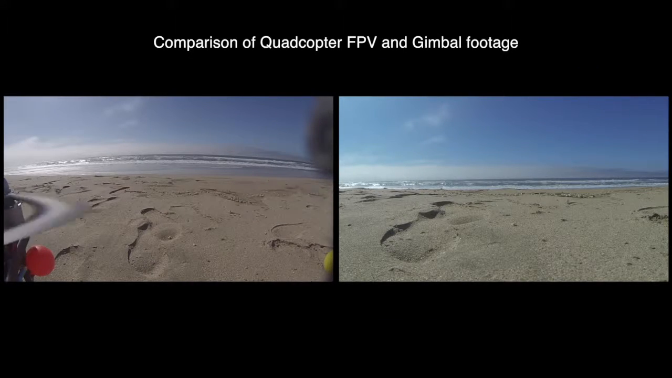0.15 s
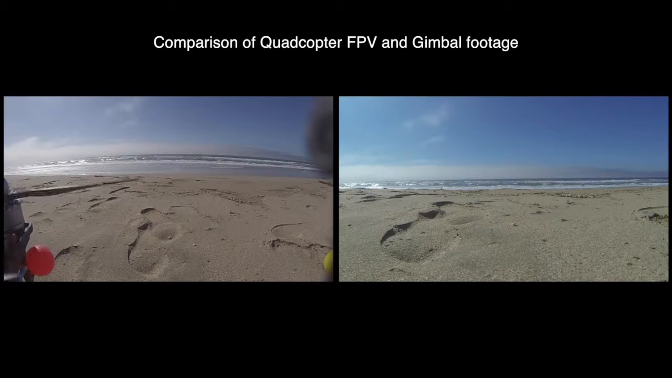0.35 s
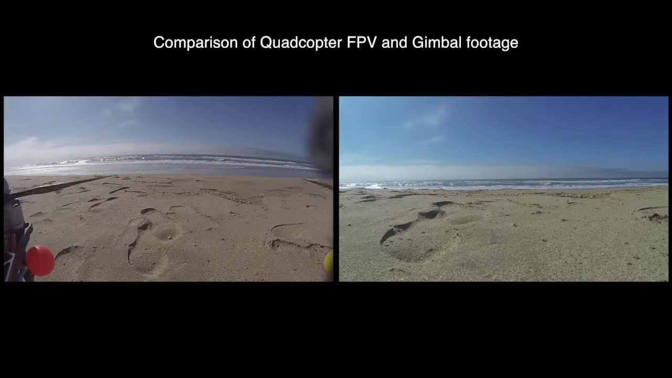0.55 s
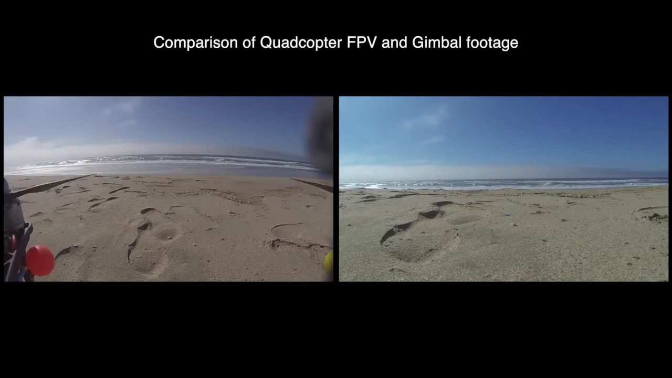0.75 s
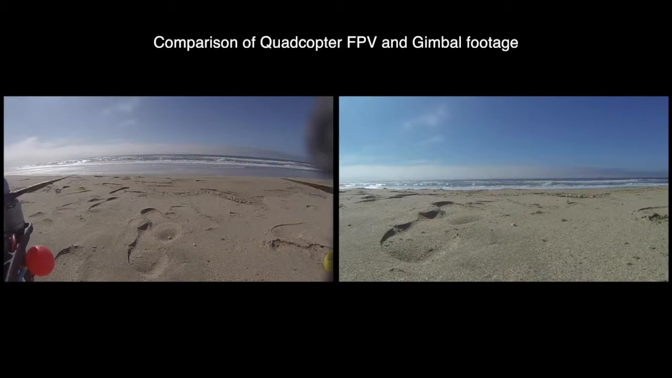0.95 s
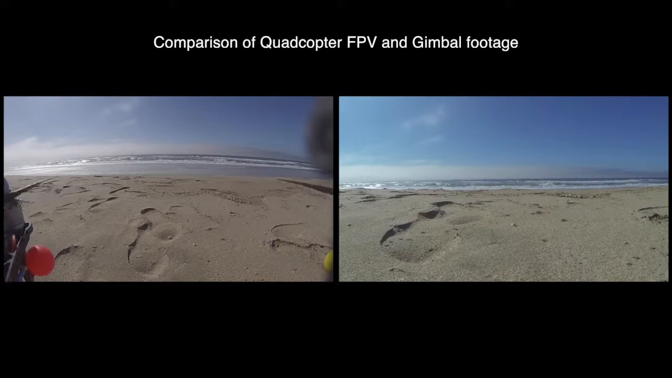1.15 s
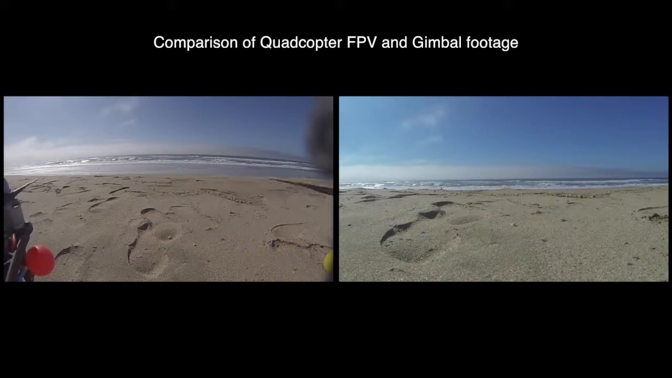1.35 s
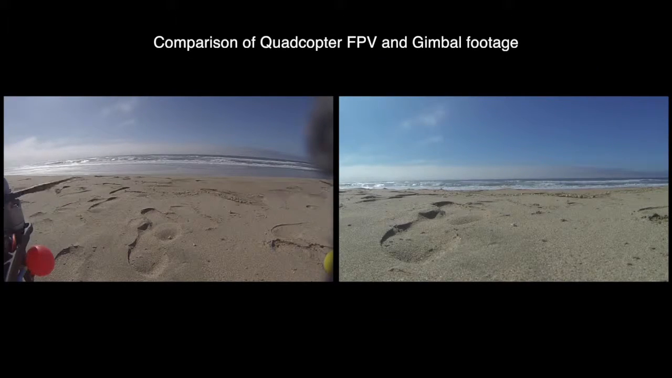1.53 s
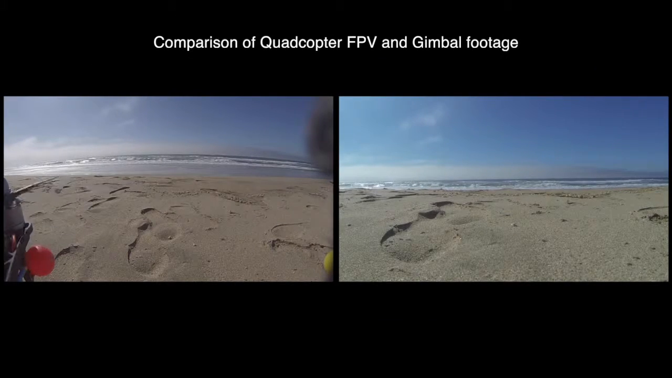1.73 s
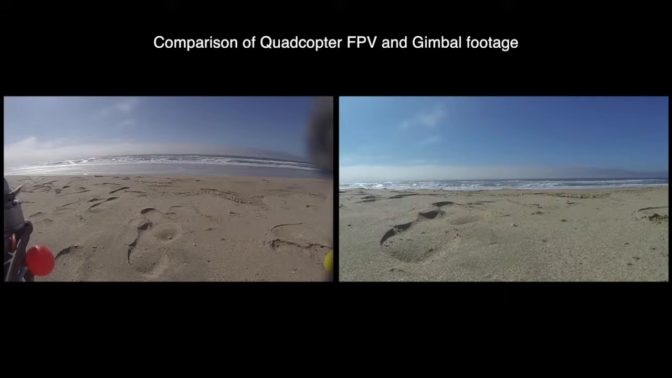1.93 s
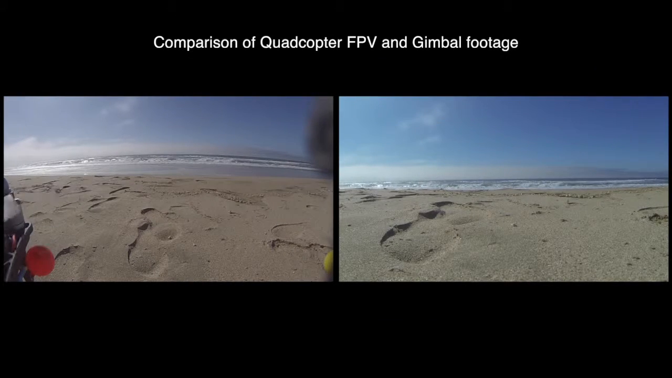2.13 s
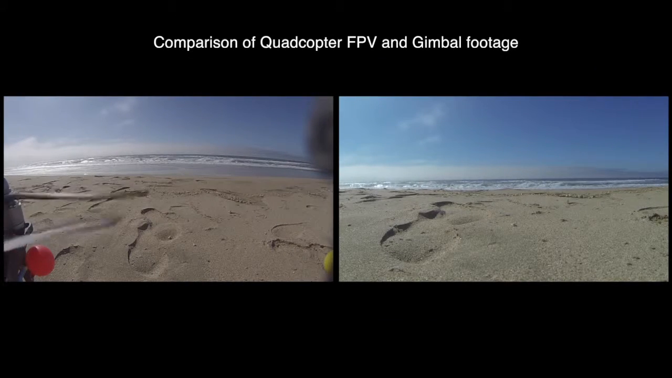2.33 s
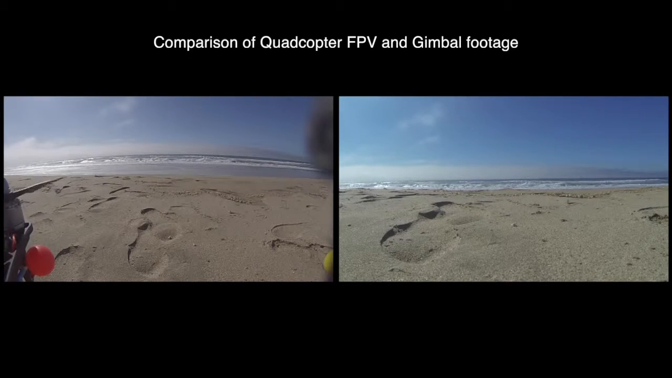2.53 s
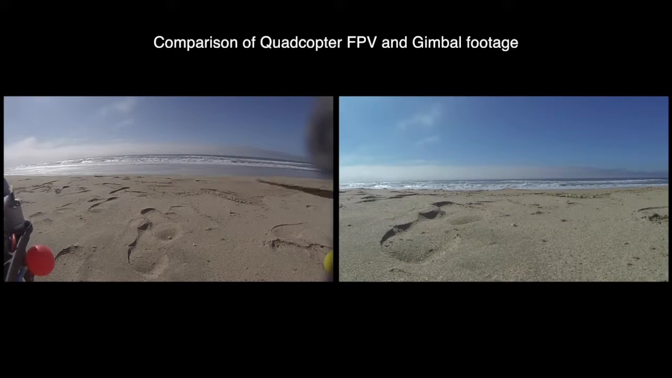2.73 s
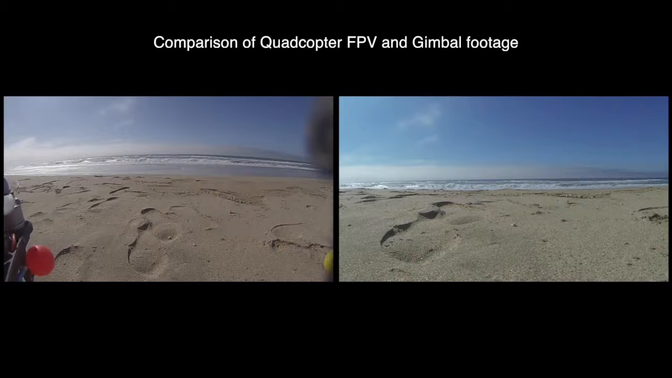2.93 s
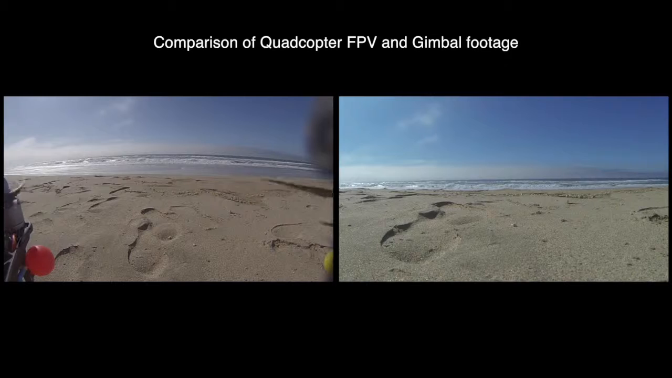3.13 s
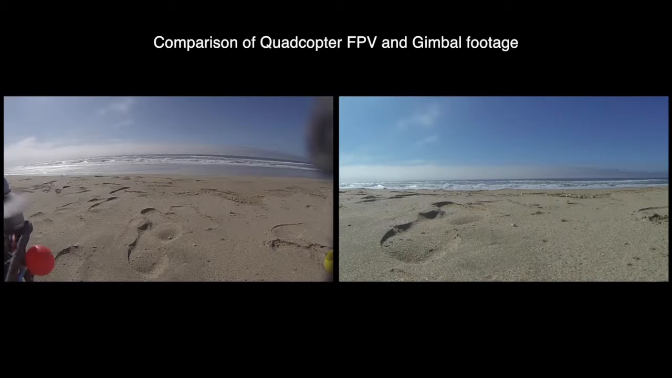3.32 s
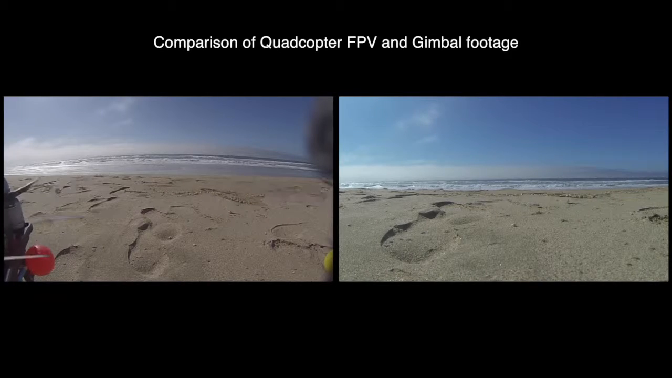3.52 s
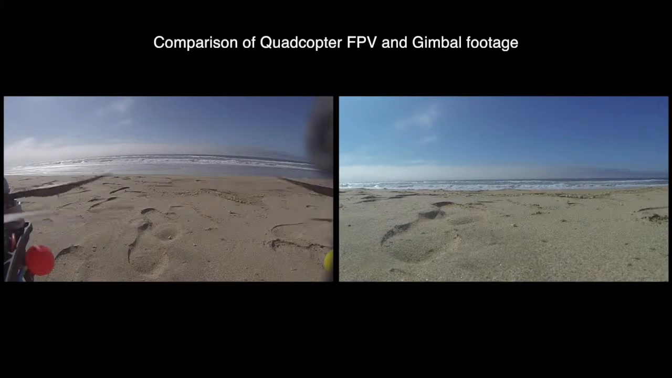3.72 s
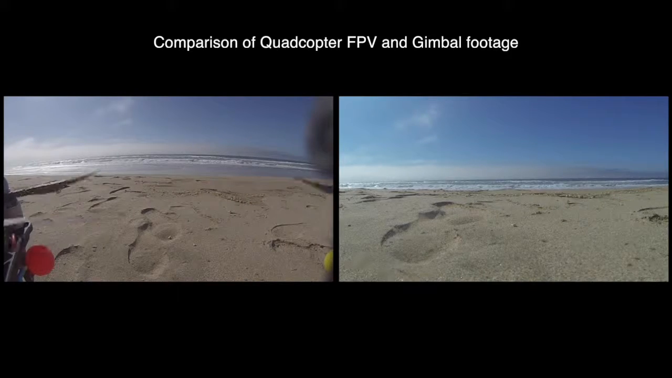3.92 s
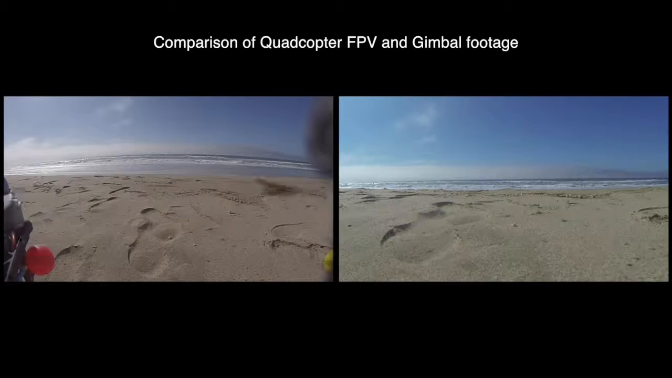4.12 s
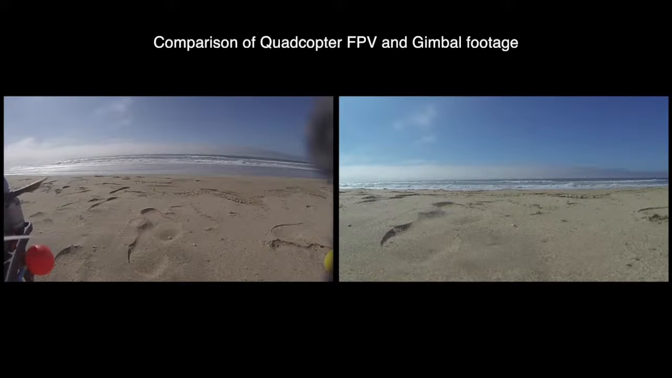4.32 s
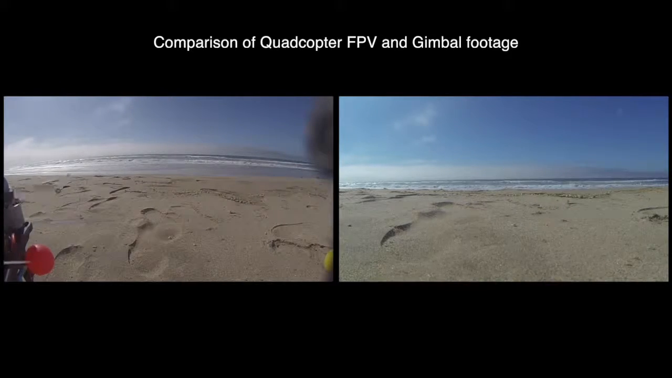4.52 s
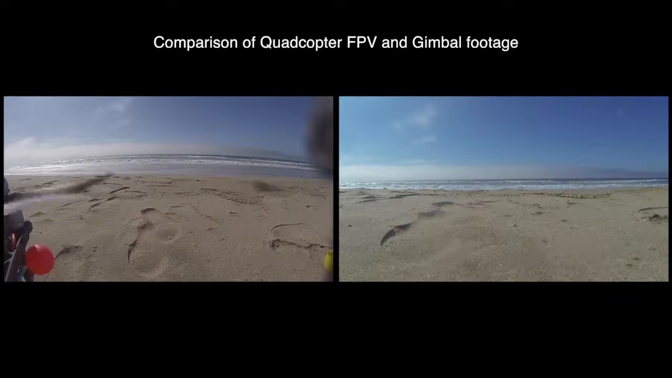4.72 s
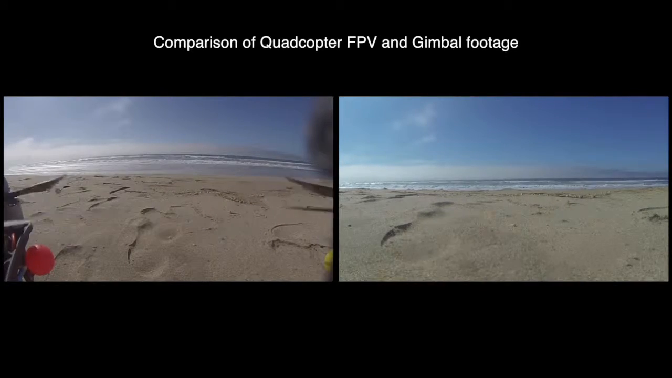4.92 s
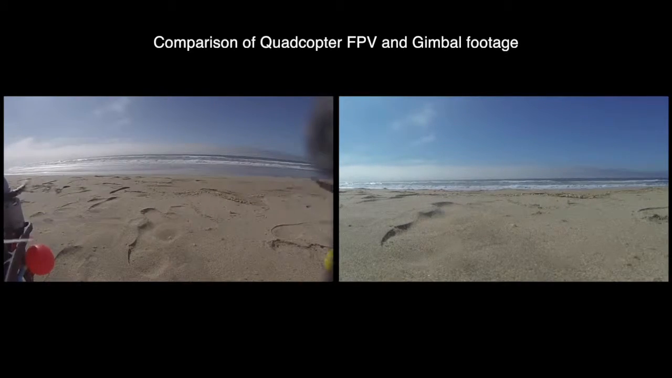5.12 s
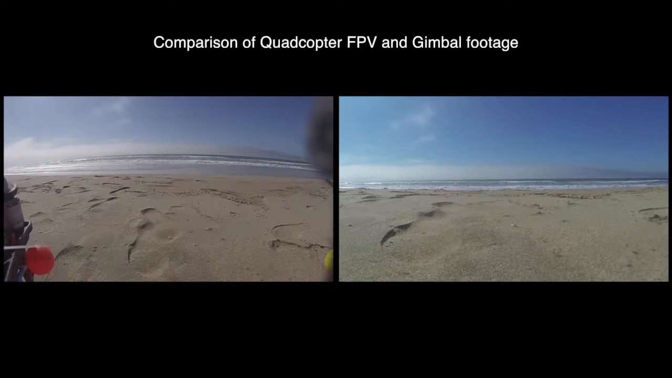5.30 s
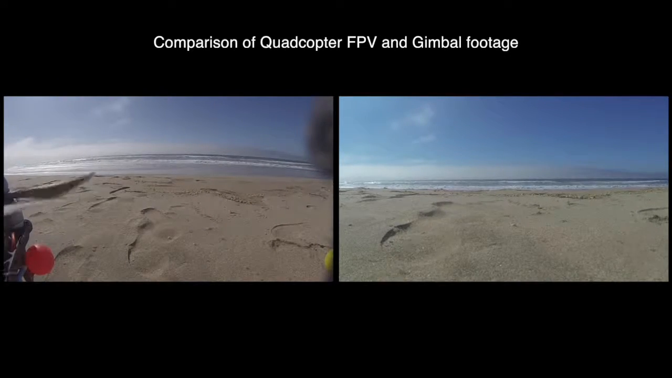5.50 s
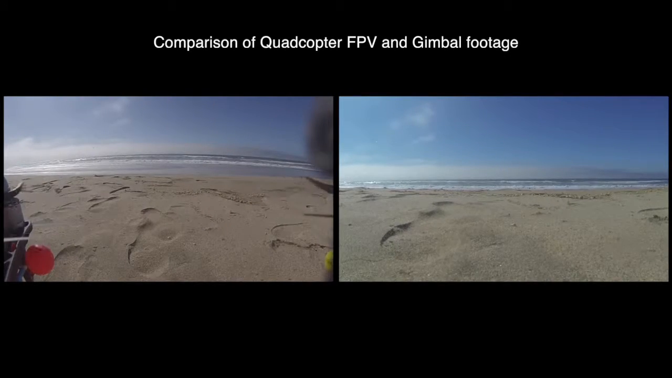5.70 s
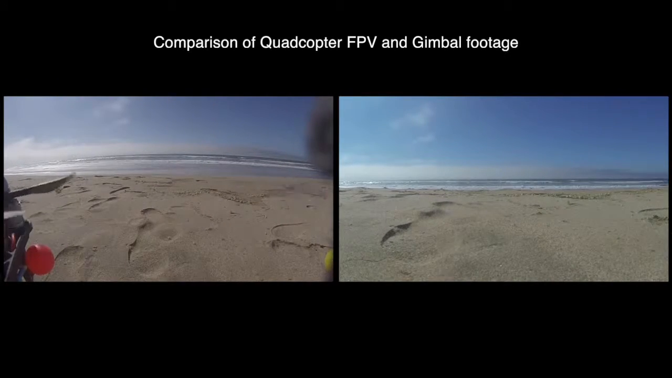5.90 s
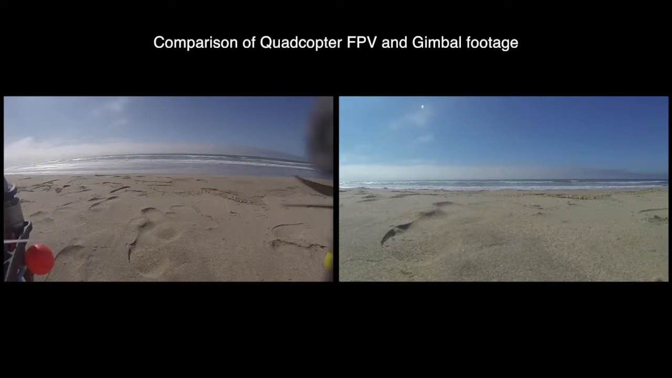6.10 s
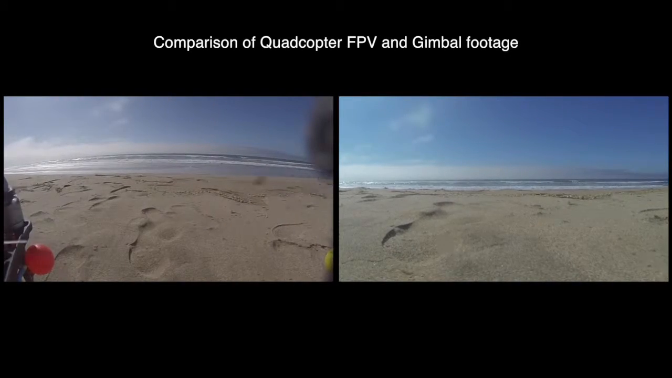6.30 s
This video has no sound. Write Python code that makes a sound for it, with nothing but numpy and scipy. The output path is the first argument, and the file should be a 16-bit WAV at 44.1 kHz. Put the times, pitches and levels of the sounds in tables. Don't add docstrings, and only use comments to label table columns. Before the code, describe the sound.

Close to an idling drone, steady high-pitched motor squeal and rattle over soft surf give way to rising blade buzz and turbulent wind thumps.

```python
import sys
import numpy as np
from scipy import signal
from scipy.fft import rfft, irfft, next_fast_len
from scipy.io import wavfile
from scipy.ndimage import uniform_filter1d

SR = 44100
rng = np.random.default_rng(int(sys.argv[2]) if len(sys.argv) > 2 else 0)


def ratio(d):
    e = np.asarray(d, float) / 20
    return 10 ** e


def wav_out(sig):
    wavfile.write(sys.argv[1], SR, np.round(np.clip(np.atleast_2d(sig).T, -1, 1) * 32767).astype(np.int16))


N = 280035

# (time [s], blade rate [Hz], thump level [dB])
ROTORS = [(2.4, 38.07, -34), (2.5, 46.15, -34), (2.66, 61.47, -20), (2.84, 73.8, -12), (3.0, 82.3, -17.5),
          (3.21, 94.14, -11.5), (3.38, 103.9, -10), (3.5, 110.3, -12), (3.7, 120.4, -12.5),
          (3.81, 124.6, -14), (4.0, 131.7, -17), (4.16, 137.2, -14), (4.4, 144.5, -11),
          (4.91, 157.7, -11.5), (5.59, 175.1, -10), (5.86, 180.5, -10.5), (6.02, 184.9, -12),
          (6.35, 199, -6)]
# (time [s], lag [blade passes])
ROTOR_LAG = [(2.5, .15), (2.68, .24), (2.88, .42), (3.08, .27), (3.21, .5), (3.3, .58), (3.39, .76),
             (3.47, .84), (3.66, 1), (3.78, 1.15), (4.18, 1.15), (4.5, 1.08), (4.91, 1), (5.25, .835),
             (5.58, .82), (5.8, .75), (5.96, .73), (6.3, .47)]
# (chop at rest [Hz], drift by the end [Hz], idle blade rate [Hz],
# speed factor in flight [1], time to reach it [s])
CONTROLLERS = [
    (8021.9, .6, 35.2, 1.0, 1.1),
    (8033.8, 1.2, 39.15, 1.05, 1),
    (8050.2, .8, 39.3, .885, 1),
    (8076.6, 1.8, 39.4, 1.001, .2),
]
# (idle [dB], flight [dB], magnet orders [dB])
FRINGE_REACH = [
    (9.5, 4, 0.5),
    (8, -14, -12),
    (-22, 4, -15),
    (-17, -7, -6),
]
# (first [dB], sag at mid-idle [dB], end of idle [dB], spin-up [dB], flight
# [dB])
CHOP_SHARES = [
    (1, -4.5, -5, -1.1, -.8),
    (-5, 0, 2.3, 2.6, -1.6),
    (-2.8, .3, -4.8, -4.1, -6.5),
    (3.5, -1, -.2, 0, 0),
]
# (start [s], end [s])
LOAD_TRADE_S = (2.8, 3.15)
# (time [s], level [dB])
COMMON_LEVEL = [(0, -33.5), (2.441, -33.5), (2.444, -25.4), (2.8, -25.2), (3.15, -20.8), (3.35, -21.3),
                (3.45, -22.7), (3.56, -25.7), (3.7, -26.7), (4, -26.3), (4.3, -27.1), (4.6, -29.3), (5, -31.4),
                (5.4, -31.1), (6.1, -33.4), (6.35, -33.4)]
SIDE_ORDERS = [-35, -28, -14, -7, -3, -2, -1, 1, 2, 3, 4, 5, 6, 7]
SIDE_DB = [-30, -27, -30, -16, -26, -24, -17, -17, -19, -19, -22, -24, -26, -18]
# (base [Hz], order of front blade rate [1])
WHINE_ORDERS = [(0, 39), (8050, -46), (8050, -35), (0, 42), (0, 48), (0, 21), (8050, -28), (0, 35), (0, 37),
                (0, 28), (0, 28), (8050, -21), (0, 63), (0, 47), (8050, -25), (0, 32.6), (0, 26.3),
                (8050, -18), (0, 25.6), (0, 42), (16100, -21)]
# (middle [s], half length [s], level [dB])
WHINE_SWELLS = [(2.67, .2, -47), (2.77, .1, -34), (3.15, .17, -32), (3.36, .4, -39.5), (3.38, .1, -36),
                (3.52, .42, -40), (3.66, .21, -32), (4.1, .24, -30), (4.11, .17, -37), (5.26, .16, -40),
                (5.68, .36, -29.5), (3.23, .12, -42), (3.33, .08, -44), (3.4, .08, -39), (4.34, .1, -39),
                (4.58, .12, -44), (5.58, .15, -41), (5.97, .16, -43), (6.2, .22, -40), (4.5, .25, -48),
                (2.72, .42, -59)]
# (frequency [Hz], width [Hz], level [dB])
FRAME_RINGS = [
    (2360, 500, 2),
    (4540, 75, 15),
    (4830, 260, 20),
    (8000, 1400, -1),
]
# (middle [s], half length [s], lift [dB])
SHAKES = [(2.5, 0.18, -1), (2.61, .04, -1), (2.78, 0.19, 4), (3.03, 0.062, 4), (3.15, 0.088, -0.5),
          (3.37, 0.057, -2), (3.7, 0.18, 5), (3.95, .06, 6), (4.09, .13, 2), (4.35, 0.14, 8.5),
          (5.23, 0.084, 8), (5.6, 0.14, 5), (6.2, 0.24, 16)]
# (frequency [Hz], density [dB/Hz])
HISS_SPECTRUM = [(1500, -23), (2500, -2), (5000, -3.5), (7500, -6), (9500, -5.5), (12000, -8.5),
                 (14300, -10), (16000, -6)]
# (frequency [Hz], gain [dB])
IDLE_TINT = [(20, -4), (10000, 0.5), (13500, -3.5), (14700, 3), (20000, 1)]
# (frequency [Hz], density [dB/Hz])
BUFFET_SPECTRUM = [(15, 3), (30, 0), (60, 0), (110, -1.5), (200, -9), (400, -43)]
# (middle [s], half length [s], level [dB])
GUSTS = [(.05, 0.14, -29), (1.4, 0.73, -28.5), (2.26, 0.14, -17.5), (2.52, 0.12, -21), (2.74, 0.081, -14),
         (3.06, 0.077, -8), (3.45, 0.19, -16), (3.76, 0.079, -18), (4.3, 0.32, -16), (4.97, 0.092, -16),
         (5.26, 0.11, -18), (5.65, 0.044, -18), (5.93, 0.16, -16)]
# (frequency [Hz], density [dB/Hz])
SURF_SPECTRUM = [(26, -39), (45, -6), (60, -6.5), (161, -8), (222, -10), (248, -8.5), (317, -11.5),
                 (383, -11), (1820, -35.5), (4000, -50), (5200, -46), (8800, -120)]
# (time [s], level [dB])
WASH = [(0, -28.5), (.45, -30), (.8, -28), (1.05, -29), (1.5, -26.5), (2.0, -27.5), (2.35, -26.5),
        (2.6, -28), (2.9, -22.5), (3.5, -26), (4.2, -21.5), (5.1, -26), (5.3, -23), (5.9, -25),
        (6.35, -23.5)]
# (frequency [Hz], density [dB/Hz])
DULL_SPECTRUM = [(200, -30), (450, -8), (800, 0), (1300, -2), (2000, -11), (3000, -26), (5000, -40)]
# (frequency [Hz], density [dB/Hz])
BRIGHT_SPECTRUM = [(250, -8), (600, -2.5), (1200, -2.5), (1900, -2.5), (2800, -10.5), (4500, -19),
                   (7000, -29), (10000, -52)]
# (middle [s], half length [s], level [dB])
PUFFS = [(3.625, 0.029, -24.5), (3.69, 0.045, -27), (3.745, 0.0081, -15), (3.87, 0.16, -24.5),
         (4.03, 0.043, -21), (4.42, 0.19, -26), (4.68, 0.077, -23), (4.81, 0.03, -27), (5.0, 0.082, -27.5),
         (5.23, 0.22, -23.5), (5.7, 0.19, -25), (6.03, 0.19, -21), (6.2, 0.12, -21), (6.32, .04, -17.5)]
# (time [s], peak [dB], frequency [Hz])
SLAPS = [(3.029, -4, 590), (3.064, 2, 736), (3.126, -10, 633), (3.548, 2.5, 660), (3.567, -7, 1284),
         (3.601, -10, 786), (3.618, -6, 1090), (3.624, 0.5, 950), (3.669, -5, 1080), (3.684, -4, 956),
         (3.709, -8, 1180), (3.745, -0.5, 1520), (3.78, -8, 953), (3.801, -6, 657), (3.844, -9, 1010),
         (3.88, -4, 1135), (3.922, 0, 616), (3.944, 3.5, 930), (5.253, -3, 1568), (4.022, -2, 1209),
         (4.029, -2, 1133), (4.095, -3, 670), (4.154, -2, 686), (4.655, -8, 641.1), (5.342, -5, 1870),
         (6.017, -3, 1410), (4.286, -7, 973.5), (4.328, -7, 622), (4.39, 1, 778), (4.424, -7, 713)]
# (middle [s], half length [s], threshold lift [dB])
TREBLE_LOSSES = [(.2, .015, 7), (.42, .02, 7), (.66, .015, 7), (.85, .025, 7), (1.2, .09, 10),
                 (1.62, .04, 10), (1.75, .04, 10), (2.22, .07, 9), (2.46, .02, 7), (2.76, .17, 10),
                 (3.22, .16, 11), (3.48, .03, 9), (3.7, .02, 9)]

THROTTLE_S = 2.443
SIDE_LEVEL_DB = -6
RATTLE_DB, RATTLE_SAG_DB, SPIN_CALM_DB = -9.5, -5.5, -2
HISS_DB, HISS_PER_DECADE_DB, HISS_FOLLOW = -50, 22, 0.55
IDLE_HZ, IDLE_THUMP_DB = 38.1, -24.5
IDLE_FADE_S, IDLE_DROP_DB = 0.93, -11
ORDER_STEP_DB, TOP_ORDER_DB, FAR_SHARE = -5.5, -6, 0.77
BUFFET_REST_DB, BUFFET_FLIGHT_DB, BUFFET_FROM_S = -42, -16.5, 2.96
DOWN_S, DOWN_DB, DOWN_RISE_DB_PER_S = 3.53, -27, 2
EARLY_WASH = 0.29
EDGE_HZ = 15300


def evened(x):
    return x / np.sqrt(np.mean(x ** 2) + 1e-20)


def curves(rows):
    s, *columns = np.transpose(rows)
    return [np.interp(np.arange(N) / SR, s, c) for c in columns]


def turns(hz):
    return 2 * np.pi * (np.cumsum(hz) / SR + rng.random())


def coloured(x, gain):
    size = next_fast_len(N)
    spectrum = rfft(x, size) * gain(np.fft.rfftfreq(size, 1 / SR))
    return irfft(spectrum, size)[:N]


def shape(points):
    f, db = np.transpose(points)
    return lambda hz: ratio(np.interp(np.log(hz + 1), np.log(f + 1), db, -80, -80))


def wander(hz):
    return evened(coloured(rng.standard_normal(N), lambda f: np.exp(-(f / hz) ** 2)))


def noise(gain, lumpy_db, lump_hz):
    steady = coloured(rng.standard_normal(N), gain)
    return evened(steady * ratio(lumpy_db * wander(lump_hz)))


def swells(rows, base_db):
    t = np.arange(N) / SR
    power = ratio(base_db) ** 2
    for s, half, db in rows:
        power = power + ratio(db) ** 2 * np.clip(1 - ((t - s) / half) ** 2, 0, 1) ** 2
    return np.sqrt(power)


def blade_rate():
    flying = np.clip((np.arange(N) / SR - ROTORS[0][0]) / 0.12, 0, 1)
    return np.where(flying > 0, curves(ROTORS)[0], IDLE_HZ), flying


def blades(phase, flying):
    thump_db, lag = curves(ROTORS)[1], curves(ROTOR_LAG)[0]
    faded = np.clip((np.arange(N) / SR - IDLE_FADE_S) / .08, 0, 1)
    idle_db = IDLE_THUMP_DB + IDLE_DROP_DB * faded + (3.5 + 3.5 * faded) * wander(6.7)
    idle = (1 - flying) * ratio(idle_db) * np.sin(phase)
    sway_db = .5 * wander(8)
    near, far = phase + np.pi * lag, phase - np.pi * lag
    thump = np.zeros(N)
    for k in range(5):
        pair = np.sin((k + 1) * near + 0.37) + FAR_SHARE * np.sin((k + 1) * far + 0.48)
        thump += ratio(ORDER_STEP_DB * k + TOP_ORDER_DB * (k == 4)) * pair
    flight = flying * ratio(thump_db + sway_db) * thump / (1 + FAR_SHARE)
    return np.sqrt(2) * (idle - flight)


def frame(hz):
    power = 1
    for f, width_hz, db in FRAME_RINGS:
        power = power + ratio(db) ** 2 / (1 + (2 * (hz - f) / width_hz) ** 2) ** 2
    return np.sqrt(power)


def chop_levels():
    t = np.arange(N) / SR
    common_db = curves(COMMON_LEVEL)[0]
    idle_part = np.clip(t / THROTTLE_S, 0, 1)
    traded = np.interp(t, LOAD_TRADE_S, (0, 1))
    levels = []
    for first, sag, last, spin_up, flight in CHOP_SHARES:
        idle_db = first + (last - first) * idle_part + sag * np.sin(np.pi * idle_part)
        flight_db = spin_up + (flight - spin_up) * traded
        levels.append(common_db + np.where(idle_part < 1, idle_db, flight_db))
    return levels


def motors(rate, phase):
    t = np.arange(N) / SR
    since = t - THROTTLE_S
    jolt_db = 4 * (since > 0) * np.exp(-abs(since) / 0.021)
    tones, fringe = np.zeros(N), np.zeros(N)
    for controller, reach, level_db in zip(CONTROLLERS, FRINGE_REACH, chop_levels()):
        chop_hz, drift_hz, idle_hz, factor, settle_s = controller
        idle_db, flight_db, magnet_db = reach
        chop = turns(chop_hz + np.linspace(0, drift_hz, N))
        settled = np.clip(since / settle_s, 0, 1)
        speed_hz = (settled * factor + (1 - settled) * idle_hz / IDLE_HZ) * rate
        rotor = turns(speed_hz * (1 + 0.00114 * wander(6.3)))
        sides = np.zeros(N)
        for k, db in zip(SIDE_ORDERS, SIDE_DB):
            sides += ratio(db + magnet_db * (k % 7 == 0)) * np.cos(chop + k * rotor + k * k)
        tones += ratio(level_db + jolt_db) * np.cos(chop)
        reach_db = np.where(since > 0, flight_db, idle_db)
        fringe += ratio(level_db + SIDE_LEVEL_DB + reach_db) * sides
    braid = ratio(2.5 * wander(30)) * (1 + .35 * np.cos(phase))
    for (base_hz, k), (s, half, db) in zip(WHINE_ORDERS, WHINE_SWELLS):
        on = abs(t - s) < half
        swell = (1 - ((t[on] - s) / half) ** 2) ** 2 * braid[on]
        tones[on] += ratio(db) * swell * np.cos(2 * np.pi * base_hz * t[on] + k * phase[on])
    return np.sqrt(2) * (tones + coloured(fringe, frame))


def whirr(rate, phase, flying):
    common_db = curves(COMMON_LEVEL)[0]
    fast = np.clip((rate - 100) / 40, 0, 1)
    rattle_db = common_db + RATTLE_DB + SPIN_CALM_DB * flying + fast * RATTLE_SAG_DB
    hiss_db = HISS_DB + HISS_PER_DECADE_DB * np.log10(rate / 46) + HISS_FOLLOW * (common_db + 22.5)
    edges = shape([(500, -49), (1100, -1), (3500, -2), (6500, -6.0), (8600, 3.5), (9300, -18)])
    rattle = noise(lambda hz: frame(hz) * edges(hz), 0.9, 19)
    hiss = noise(shape(HISS_SPECTRUM), 1.0, 280) * (1 + 0.24 * flying * np.cos(phase))
    hiss = flying * hiss + (1 - flying) * coloured(hiss, shape(IDLE_TINT))
    return ratio(rattle_db + 2.76) * swells(SHAKES, 0) * rattle + ratio(hiss_db + 10.5) * hiss


def wind():
    base_db = np.where(np.arange(N) / SR < BUFFET_FROM_S, BUFFET_REST_DB, BUFFET_FLIGHT_DB)
    wash_db = curves(WASH)[0] + .6 * wander(5)
    buffet = ratio(-4.0) * swells(GUSTS, base_db) * noise(shape(BUFFET_SPECTRUM), 1.8, 21)
    return buffet + ratio(wash_db + 3) * noise(shape(SURF_SPECTRUM), 0.27, 33)


def downwash(rate, phase):
    since = np.arange(N) / SR - DOWN_S
    early = EARLY_WASH * np.clip((rate - 40) / 35, 0, 1)
    onset = np.clip(since / 0.12, early, 1)
    full = np.clip((rate - 122) / 40, 0, 1)
    gate = .2 + .55 * full + np.exp(3 * (np.cos(phase - .6) - 1))
    gate *= ratio((3.5 - 2.0 * full) * wander(120))
    burst = gate / uniform_filter1d(gate ** 2, 8000) ** .5 * rng.standard_normal(N)
    dull = evened(coloured(burst, shape(DULL_SPECTRUM)))
    bright = evened(coloured(burst, shape(BRIGHT_SPECTRUM)))
    out = (1 - full) * dull + full * bright
    out *= onset * swells(PUFFS, DOWN_DB + DOWN_RISE_DB_PER_S * since)
    t = np.arange(170) / SR
    for s, peak_db, hz in SLAPS:
        at = round(s * SR)
        slap = np.hanning(len(t)) ** 2 * np.cos(2 * np.pi * hz * (t - t.mean()))
        out[at:at + len(t)] -= ratio(peak_db - 7.0) * slap
    return out


def masked(x):
    hz, t, z = signal.stft(x, SR, nperseg=1024)
    power = uniform_filter1d(uniform_filter1d(abs(z) ** 2, size=4, axis=1), size=2, axis=2)
    chop_power = power[:, (hz > 7900) & (hz < 8200)].max(axis=1)
    tone = uniform_filter1d(chop_power, size=7, axis=1)[:, None]
    lift_db = sum(db * (abs(t - s) < half) for s, half, db in TREBLE_LOSSES)
    shadow_db = -42 - 9 * (abs(hz - 9300) / 2200) ** 2
    loud = power > tone * ratio(shadow_db[:, None] + lift_db) ** 2
    keep = loud | (hz < 8750)[:, None] | (hz > 11600)[:, None]
    return signal.istft(z * keep, SR, nperseg=1024)[1][:, :N]


def scene():
    rate, flying = blade_rate()
    phase = turns(rate)
    drone = blades(phase, flying) + motors(rate, phase) + whirr(rate, phase, flying)
    return (drone + wind() + downwash(rate, phase))[None]


def top_cut(x):
    return signal.sosfilt(signal.butter(12, 15760, fs=SR, output="sos"), x)


def record(dry):
    low_pass = signal.firwin(2001, EDGE_HZ, window=("kaiser", 8), fs=SR)
    limited = signal.oaconvolve(masked(dry), low_pass[None], "same")
    mix = np.clip(0.99 * limited, -1, 1)
    return top_cut(mix)


dry = scene()
out = record(dry)
wav_out(out)
```